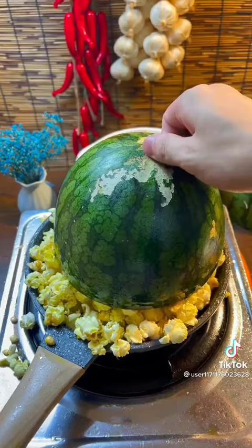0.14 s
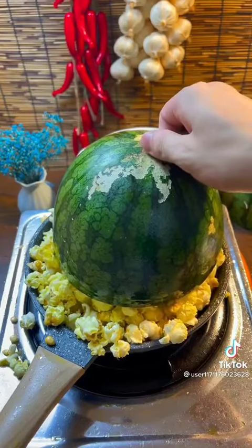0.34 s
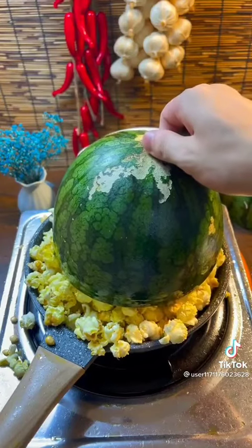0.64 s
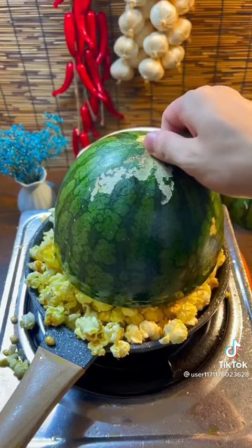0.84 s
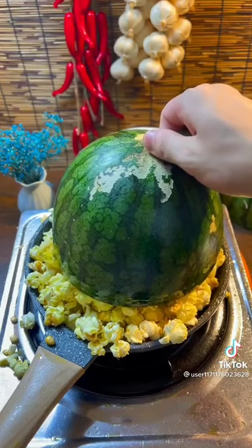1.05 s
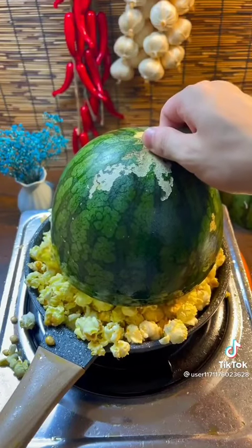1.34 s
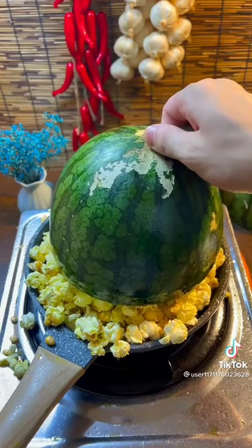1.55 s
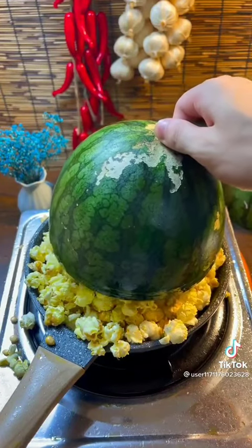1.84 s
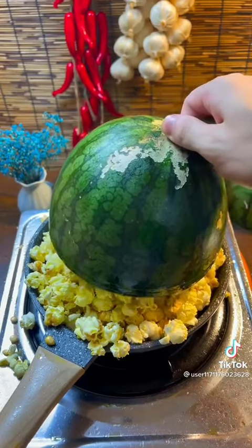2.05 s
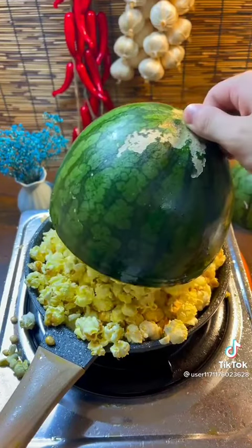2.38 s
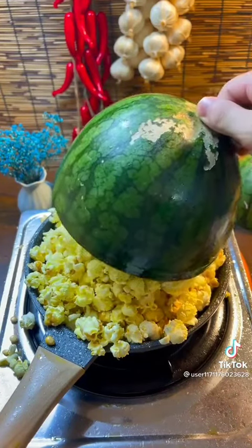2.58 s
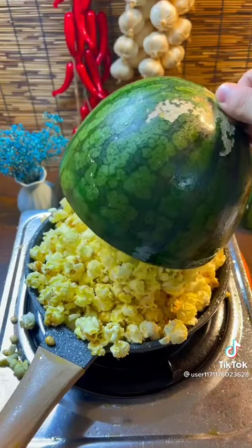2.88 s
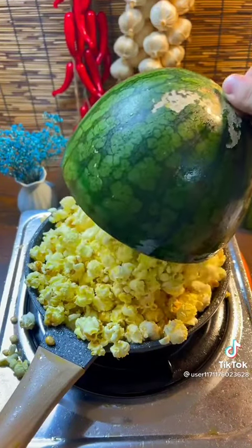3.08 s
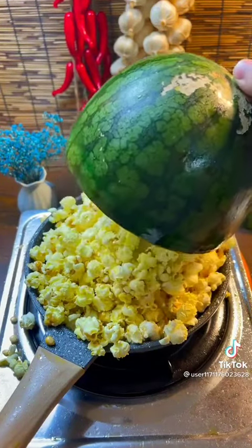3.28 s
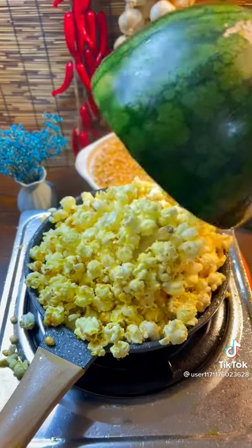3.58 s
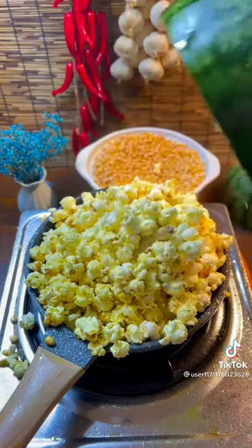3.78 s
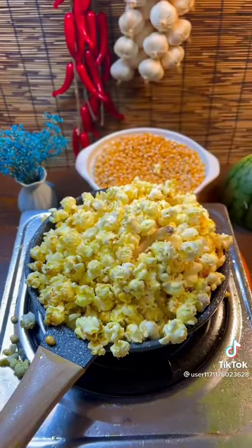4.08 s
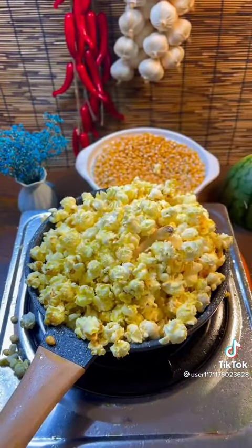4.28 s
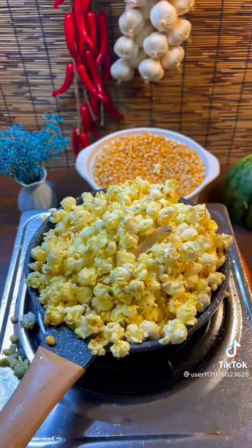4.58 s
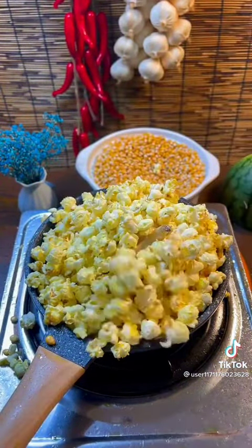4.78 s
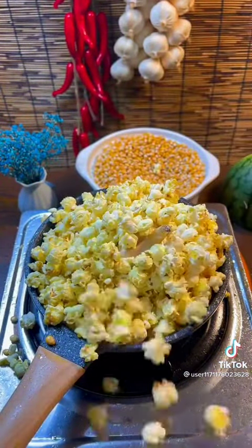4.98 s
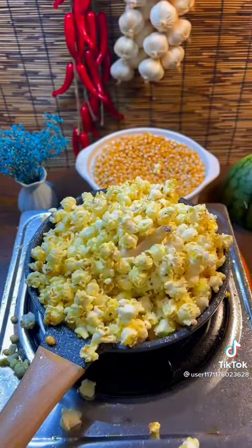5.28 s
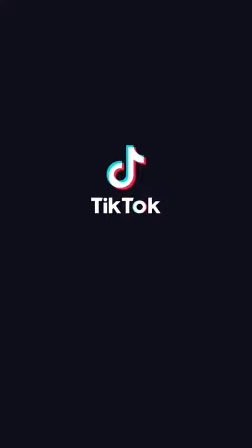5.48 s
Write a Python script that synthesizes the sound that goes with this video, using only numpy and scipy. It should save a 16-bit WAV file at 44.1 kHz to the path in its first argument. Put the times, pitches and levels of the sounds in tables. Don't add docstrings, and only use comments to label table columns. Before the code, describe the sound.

Close sizzling pan with small crackles and dull shell knocks, a quiet lull, then sharp popcorn bursts and flakes pattering onto sheet metal.

```python
import sys
import numpy as np
from scipy import signal
from scipy.io import wavfile
from scipy.ndimage import uniform_filter1d

SR = 44100
rng = np.random.default_rng(int(sys.argv[2]) if len(sys.argv) > 2 else 0)


def nominal_scale(level):
    x = np.asarray(level, float) / 20
    return 10 ** x


def generate_wav(signal):
    frames = np.transpose(np.atleast_2d(signal))
    scaled = np.clip(frames, -1, 1) * 32767
    pcm = np.round(scaled).astype(np.int16)
    wavfile.write(sys.argv[1], SR, pcm)


N = 248283
OPEN_S = 4.43


def evened(x):
    return x / np.sqrt(np.mean(x ** 2) + 1e-20)


def curve(points):
    return np.interp(np.arange(N) / SR, *np.transpose(points))


def read(points, hz):
    f, value = np.transpose(points)
    return np.interp(np.log(hz + 1), np.log(f + 1), value)


def coloured(x, points):
    level_db = read(points, abs(np.fft.fftfreq(4096, 1 / SR)))
    log_gain = np.log(nominal_scale(np.maximum(level_db, -70)))
    taps = np.fft.ifft(np.exp(np.conj(signal.hilbert(log_gain)))).real[:2048]
    return signal.oaconvolve(x, taps / np.linalg.norm(taps))[:len(x)]


def resonate(x, hz, width):
    turn = np.exp(2j * np.pi * np.cumsum(hz * np.ones(len(x))) / SR)
    r = np.exp(-np.pi * width / SR)
    return 2 * (turn * signal.lfilter([1 - r], [1, -r], x / turn)).real


def ring(x, modes, rise=1e-4):
    t = np.arange(SR // 2) / SR
    response = sum(nominal_scale(db - 60 * t / t60) * np.sin(2 * np.pi * hz * t) for hz, db, t60 in modes)
    return signal.oaconvolve(x, response * np.minimum(t / rise, 1))[:len(x)]


def add(mix, s, sound):
    part = mix[round(s * SR):][:len(sound)]
    part += sound[:len(part)]


def patchy(points, patch_db, flicker_db, size):
    frames = 4 * N // size + 5
    a, b, patches = rng.standard_normal((frames, size // 2 + 1, 3)).T
    patches = evened(uniform_filter1d(uniform_filter1d(patches, 4, 0), 8, 1))
    flicker = evened(uniform_filter1d(rng.standard_normal(frames), 3))
    usual_db = read(points, np.fft.rfftfreq(size, 1 / SR))[:, None]
    field = (a + 1j * b) * nominal_scale(usual_db + patch_db * patches + flicker_db * flicker)
    return evened(signal.istft(field, nperseg=size, noverlap=3 * size // 4)[1][:N])


# pitch_hz, density_db (per Hz)
EARLIER_SPECTRUM = [(500, -25), (1000, -18), (1400, 3), (1850, -10), (2600, 0), (3700, -9), (6500, -7),
                    (10500, -13), (12500, -9), (14400, -13)]


def earlier():
    t = np.arange(N) / SR
    fall_db_per_s = 150
    return nominal_scale(-42 - fall_db_per_s * t) * patchy(EARLIER_SPECTRUM, 1.2, .8, size=256)


# start_s, length_s, level_db
PAN_ROCKING = [(0, 0.19, -45), (0.297, 0.18, -53.5), (0.9, 0.67, -48.5), (1.702, 0.28, -64),
               (2.105, 0.084, -53.5), (2.37, 0.28, -55.5), (2.702, 0.46, -66), (3.2, 0.061, -55),
               (3.556, 0.27, -56), (4.441, 0.13, -38.5), (4.601, 0.084, -44), (4.721, 0.031, -37.5),
               (4.78, 0.12, -50), (4.925, 0.11, -40.5), (5.03, .55, -53.5)]
ROCK_REST_DB, ROCK_RISE_S, ROCK_FALL_S = -59, 0.017, 0.025


def rocking():
    t = np.arange(N) / SR
    power = nominal_scale(ROCK_REST_DB) ** 2
    for s, length, db in PAN_ROCKING:
        rise = 1 + (t - s) / ROCK_RISE_S
        fall = 1 - (t - s - length) / ROCK_FALL_S
        swell = np.clip(np.minimum(rise, fall), 0, 1)
        power = power + (nominal_scale(db) * swell) ** 2
    return np.sqrt(power)


# pitch_hz, width_hz, level_db
FAN_TONES = [(245.5, 5.8, -68), (298, 11, -74.5), (731, 76, -75)]


def stove():
    pitch_drift, level_drift = evened(signal.resample(rng.standard_normal((2, 160)), N, axis=1))
    phase = 2 * np.pi * np.cumsum(48 + 4.6 * pitch_drift) / SR
    rumble = np.sin(phase) * nominal_scale(3.6 * level_drift)
    tones = sum(nominal_scale(db) * evened(resonate(rng.standard_normal(N), hz, width)) for hz, width, db in FAN_TONES)
    return rocking() * evened(rumble) + tones


# start_s, end_s, start_pitch_hz, end_pitch_hz, level_db
RIM_SQUEAKS = [
    (0, 0.087, 1415, 1350, -61),
    (.33, 0.443, 1210, 1160, -64),
    (0.32, 0.554, 1390, 1450, -65),
    (1.538, 1.805, 1160, 1420, -64.5),
    (1.79, 1.89, 840, 830, -67.5),
    (3.273, 3.34, 1500, 1640, -65),
    (3.418, 3.465, 1350, 1340, -65),
    (3.42, 3.482, 500, 490, -58),
    (3.607, 3.673, 1080, 1050, -61.5),
]


def squeaks():
    out = np.zeros(N)
    draws = rng.standard_normal((len(RIM_SQUEAKS), SR // 2))
    for draw, (s, until, hz, end_hz, db) in zip(draws, RIM_SQUEAKS):
        n = round((until - s) * SR)
        glide = np.linspace(hz, end_hz, n)
        breath = evened(resonate(resonate(draw[:n], glide, 110), glide, 200))
        add(out, max(s, 0), nominal_scale(db) * breath * signal.windows.tukey(n, .4))
    return out


# pitch_hz, density_db (per Hz)
STIR_SPECTRUM = [(15, -37.5), (25, 0), (70, 0), (97, -8.5), (130, -0.5), (161, -5), (190, -6), (240, -5.5),
                 (410, -10), (700, -19.5), (910, -38), (1500, -99)]
# pitch_hz, density_db (per Hz)
RUB_SPECTRUM = [(350, -47), (600, -6.5), (866, -2), (996, -6.5), (1110, -5.5), (1210, -2.5), (1900, -12.5),
                (2470, -60), (4180, -120)]
# time_s, drag_db (above rest)
SHELL_DRAG = [(0, 17), (.08, 10), (.23, 5), (.46, 10.5), (.56, 5.5), (.8, 6), (1.29, 3), (1.51, 7),
              (1.94, 5.5), (2.06, 2), (3.13, -1), (3.3, 5), (3.42, 18), (3.6, 8.5), (3.8, 11), (3.93, 2.5),
              (4.42, -2)]
# time_s, slump_db (above rest)
HEAP_SLUMP = [
    (4.43, -6),
    (4.53, 14),
    (4.69, -2),
    (4.72, 18),
    (4.89, 3),
    (5.03, 18),
    (5.3, 16.5),
    (5.5, 2),
    (5.575, 8.5),
]


def heap():
    stir = patchy(STIR_SPECTRUM, 1.36, 2.15, size=1024)
    rub = patchy(RUB_SPECTRUM, 2.5, 0.44, size=1024)
    shut = np.arange(N) / SR < OPEN_S
    drag, slump = curve(SHELL_DRAG), curve(HEAP_SLUMP)
    rock_db = 20 * np.log10(rocking()) - ROCK_REST_DB
    stir_db = -61 + np.where(shut, 0.49 * drag + 0.29 * rock_db, 0.62 * slump)
    rub_db = -73 + np.where(shut, drag, 0.95 * slump)
    return nominal_scale(stir_db) * stir + nominal_scale(rub_db) * rub


def spits(per_s, spread_db):
    draw = rng.random((N, 3))
    present = draw[:, 0] < per_s / SR
    return present * np.sign(draw[:, 1] - .5) * nominal_scale(-spread_db * np.log(draw[:, 2] + 0.0073))


# pitch_hz, density_db (per Hz)
SHUT_FIZZ = [(1060, -27), (1800, -12), (2300, -2), (3150, -3.5), (3600, -11), (4570, -7), (5580, -13),
             (6410, -6.5), (8250, -11), (9730, -9.5), (10600, -14), (12000, -8), (14400, -14.5)]
# pitch_hz, density_db (per Hz)
TORN_FIZZ = [(900, -33), (1600, -8), (2600, 1), (3600, -7.5), (5200, -7.5), (6400, -7), (8000, -8.5),
             (9500, -5), (10600, -8), (12000, -4), (14400, -6)]
# time_s, level_db
FIZZ_LEVEL = [(0, -58), (.1, -56), (.18, -58.5), (.5, -66.5), (.9, -63.5), (1.6, -66), (2.9, -68.5),
              (3.34, -65.5), (3.42, -60), (3.8, -63.5), (3.93, -67), (4.42, -70), (4.44, -67), (4.97, -64),
              (5.03, -45), (5.27, -46), (5.31, -55.5), (5.55, -65)]


def oil():
    smear = nominal_scale(-60 * np.arange(600) / SR / 0.012)
    clicks = signal.oaconvolve(abs(spits(400, 3.3)), smear)[:N] * rng.standard_normal(N)
    shut = 0.9 * patchy(SHUT_FIZZ, 1.3, 1.4, size=256) + 0.85 * evened(coloured(clicks, SHUT_FIZZ))
    torn = 0.82 * patchy(TORN_FIZZ, 2.7, 2.0, size=256) + 0.77 * evened(coloured(clicks, TORN_FIZZ))
    return nominal_scale(curve(FIZZ_LEVEL)) * np.where(np.arange(N) / SR < OPEN_S, shut, torn)


def tear(draw, rise, length, spread_db):
    t = np.arange(len(draw)) / SR
    clicks = np.sign(draw[:, 0] - .5) * nominal_scale(-spread_db * np.log(draw[:, 1] + 0.015))
    return clicks * np.minimum(t / rise, 1) * nominal_scale(-20 * np.maximum(t - rise, 0) / length)


# pitch_hz, density_db (per Hz)
CRACK_SPECTRUM = [(150, -44), (400, -16), (900, -21.5), (1400, -7), (1800, -17.5), (2700, -8), (4100, -12),
                  (6370, -10), (8100, -13.5), (9570, -12), (10400, -18), (11800, -7.5), (12600, -12.5),
                  (14600, -15.5)]


def crackle(draw, db, treble_db, length=None, spray_db=-6.0):
    wall_hz = np.interp(draw[-1, 0], (0, 1), (2100, 3130))
    length = length or np.interp(draw[-1, 1], (0, 1), (0.0028, 0.0077))
    snap = 3.25 * tear(draw, .0001, 0.00051, 3.25)
    body = tear(draw, 0.00033, length, 6.53)
    spray = nominal_scale(spray_db) * tear(draw[::-1], 0.0037, 0.042, 3.0)
    x = coloured(snap + body + spray, CRACK_SPECTRUM)
    top = x - uniform_filter1d(x, size=5)
    wall_db = 5.5 - 0.4 * treble_db
    x = x + (nominal_scale(treble_db) - 1) * top + nominal_scale(wall_db) * resonate(x, wall_hz, 520)
    return nominal_scale(db) * x / abs(x).max()


# start_s, peak_db, treble_db, some with length_s, spray_db
SHELL_CRACKLES = [(.151, -26, 4.5), (0.1705, -25, 11, .002, -12), (.196, -41, -5), (0.237, -41, 0),
                  (.344, -41, 20), (0.3745, -42, 4), (0.4333, -40.5, 3.5), (0.4497, -32, 18, .002, -12),
                  (0.5763, -29.5, -10, .004, -11), (0.7629, -28.5, 7), (.836, -41, 8), (0.9016, -33.5, 4.5),
                  (0.92, -33, 0.5), (0.9799, -35, 1), (1.0098, -33, 4), (1.052, -41, -2), (1.13, -25.5, 9),
                  (1.211, -34, 2), (1.2464, -40, 4), (1.2714, -36.5, 2), (1.3162, -32.5, 16),
                  (1.4255, -38.5, -2), (1.47, -35, 7), (1.488, -34, -1.5)]
# start_s, peak_db, treble_db, some with length_s, spray_db
LIFTING_CRACKLES = [(1.6472, -43, 7), (1.92, -30.5, 22), (2.1003, -34.5, 2), (2.13, -33, -1),
                    (2.266, -43.5, 1), (2.36, -44.5, 1), (2.3796, -36.5, 8), (2.5505, -49, -21),
                    (2.6588, -49, -23), (2.851, -42, 5), (2.882, -48.5, -1), (3.203, -46.5, 3),
                    (3.3425, -28, -1, .006, -8), (3.3895, -27, 0, .004, -9), (3.4215, -41, -8),
                    (3.4675, -33, 6, .002, -13), (3.585, -39, 8), (3.613, -29, 4.5), (4.051, -48, -5),
                    (4.0768, -31.5, 4)]
# start_s, peak_db, treble_db
FURTHER_CRACKLES = [(.056, -42, -6), (2.771, -45.5, -3), (2.04, -48.5, -12), (.133, -36, 8), (0.581, -35.5, 16),
                    (0.5937, -36, 18), (0.635, -41, -2), (.785, -36, 2), (1.123, -40, -3), (1.137, -38, 1),
                    (1.262, -38.5, 0), (1.279, -35, 2), (1.321, -37, -4), (1.497, -30.5, 11),
                    (1.509, -38.5, -5), (1.929, -40, 7), (3.3565, -33, 8), (3.4825, -37, 4), (2.491, -51, -18)]
# start_s, peak_db, treble_db, length_s, some with spray_db
OPEN_CRACKLES = [
    (4.688, -45, 12, 0.0068),
    (4.89, -55, 7, .004),
    (4.95, -24, 7, 0.0087),
    (5.079, -26, 34, 0.002, -12),
    (5.157, -24, -3, 0.022),
    (5.206, -29.5, -1, .01),
    (5.259, -24, 14, 0.003, -10),
    (5.422, -38, 7.5, 0.014),
    (5.561, -44.5, 4, 0.017),
]
# start_s, peak_db, treble_db
FLAKE_TICKS = [(0.1108, -36, 19), (0.1194, -35, 15), (0.373, -47, 6.5), (0.624, -41, 6), (0.6639, -54, 4.5),
               (1.0613, -38, 6), (1.0954, -48, 9), (1.1643, -40, 8), (1.2926, -42, 6), (1.4205, -44, 6),
               (1.433, -40, 3), (1.5714, -58, 6), (1.6655, -46, 6), (1.7215, -50, 6), (1.7913, -54, -1),
               (1.9517, -43, 6), (2.3087, -50, 4), (2.7516, -47, 0), (2.9587, -54, 3), (3.0225, -58, 4),
               (3.1273, -43, 3), (3.2146, -43, 4), (3.257, -48, 11), (3.5184, -51, 10), (3.661, -44, 11),
               (3.717, -45, 6), (3.7554, -45, 9), (3.845, -45, 6), (3.8762, -44, 2), (4.143, -56, 4),
               (4.2702, -52, 6)]


def crackles():
    ticks = [(s, db - 0.5, treble_db, 0.0033) for s, db, treble_db in FLAKE_TICKS]
    rows = SHELL_CRACKLES + LIFTING_CRACKLES + FURTHER_CRACKLES + OPEN_CRACKLES + ticks
    out = np.zeros(N)
    for draw, (s, *how) in zip(rng.random((len(rows), 4000, 2)), rows):
        add(out, s - .0005, crackle(draw, *how))
    return out


# start_s, peak_db, treble_db
FAT_SPECKS = [(.0987, -40, 8), (.1235, -40, 12), (.158, -41, 16), (.1755, -36, 10), (.268, -46, 4),
              (.278, -47, -4), (.3007, -46, 6), (3.3665, -38, 18), (3.3775, -39, 10), (3.4085, -40, 18),
              (3.46, -42, 14), (3.4915, -44, 16), (.4625, -42, 12), (5.062, -30, 26), (5.0665, -29, 14),
              (5.096, -29, 24), (5.126, -33, 18), (5.225, -31, 26), (5.237, -29, 16), (5.245, -30, 20),
              (5.254, -31, 24), (5.266, -30, 26), (5.286, -32, 12), (5.31, -38, 20), (5.344, -40, 4)]


def specks():
    out = np.zeros(N)
    for draw, (s, db, treble_db) in zip(rng.random((len(FAT_SPECKS), 4000, 2)), FAT_SPECKS):
        add(out, s - .0005, crackle(draw, db, treble_db, length=.0015, spray_db=-18))
    return out


# start_s, peak_db, pitch_hz
SHELL_KNOCKS = [(0.153, -44.5, 479), (0.576, -43, 1390), (0.764, -42, 466), (0.839, -56, 452),
                (0.865, -49.5, 1490), (0.92, -44.5, 1410), (1.011, -54, 452), (1.051, -58, 724),
                (1.132, -49, 468), (1.318, -49, 673), (1.432, -57, 740), (1.507, -51, 1500),
                (1.795, -59, 840), (1.92, -46, 826), (2.101, -52, 1380), (2.128, -48, 570),
                (2.769, -57, 589), (3.342, -34.5, 590), (3.388, -42.5, 1240), (3.584, -47, 452),
                (3.612, -45, 1060), (4.077, -57, 1190)]


def knocks():
    out = np.zeros(N)
    width_hz = 580
    for draw, (s, db, hz) in zip(rng.random((len(SHELL_KNOCKS), 2000, 2)), SHELL_KNOCKS):
        blow = tear(draw, 0.00047, 0.0064, 5.8)
        x = resonate(resonate(blow, hz, width_hz), hz, 1.6 * width_hz)
        add(out, s - .0005, nominal_scale(db - 2.5) * x / abs(x).max())
    return out


# start_s, peak_db, colour (row of HULL_COLOURS), rise_s, length_s
HULL_TEARS = [(4.4296, -4, 0, 0.00076, 0.0044), (4.4338, -8, 3, 0.00047, 0.004),
              (4.7115, -21.5, 1, 0.0032, 0.011), (4.717, -18, 1, .0025, 0.0077),
              (4.7284, -27.5, 1, 0.00087, 0.002), (4.735, -31, 1, .002, 0.0093),
              (4.747, -35, 4, 0.0011, 0.0068), (4.444, -22, 3, .004, 0.0053), (4.772, -42, 4, 0.005, .02),
              (4.9222, -14, 2, 0.00032, .0015), (4.9132, -14, 2, 0.00097, 0.011),
              (4.918, -14, 2, 0.00093, 0.0062)]
# pitch_hz, density_db (per Hz)
HULL_COLOURS = [
    [(35, -40.5), (60, -5.5), (285, -4), (550, -13), (780, 0), (1100, 5), (1400, 7), (1700, -6.5),
     (2760, 4.5), (3900, -4.5), (4270, -6), (4680, -4), (9530, -12), (14400, -14.5)],
    [(35, -48), (60, -24), (500, 0), (750, 3), (984, 1), (1240, 5), (1870, -14.5), (2250, -9.5),
     (3560, -26), (4680, -13), (5500, -26), (12500, -26.5), (14400, -47)],
    [(35, -41.5), (60, -12), (240, -1), (400, -10.5), (878, 1.5), (1790, -9.5), (2960, 0), (3810, -10),
     (4170, -11.5), (8000, -13), (9900, -6), (14400, -12)],
    [(35, -41), (60, -12), (400, -10), (900, -2), (1400, 1), (1900, -8), (2700, 0), (4200, -9), (9500, -12),
     (14400, -20)],
    [(35, -45), (200, -14), (450, -2), (800, 2), (1300, -3), (2000, -16), (4000, -32), (14400, -50)],
]
# pitch_hz, level_db, t60_s
PAN_MODES = [(883, -60, .3), (1290, -52, .2), (1425, -51, .25), (2433, -55, .25), (335, -51.5, 0.13),
             (1130, -53.5, 0.24), (2630, -53, 0.17), (2670, -39, .025)]
# pitch_hz, level_db, t60_s
BOOM_MODES = [(48, -40.5, .5), (125, -42, .2), (194, -33.5, 0.33), (231, -37, 0.4)]
# pitch_hz, level_db, t60_s
SHELL_MODES = [(460, -48, .06), (623, -42, .04), (765, -35, .045), (1240, -36.5, .06), (4700, -51, .03)]


def bursts():
    out = np.zeros(N)
    for draw, (s, db, colour, rise, length) in zip(rng.random((len(HULL_TEARS), 4000, 2)), HULL_TEARS):
        x = coloured(tear(draw, rise, length, 4.45), HULL_COLOURS[round(colour)])
        add(out, s, nominal_scale(db) * x / abs(x).max())
    t = np.arange(N) / SR
    on_floor = out * (t < 4.61)
    buried = out * (t > 4.7) * (t < 4.8)
    return out + ring(on_floor, PAN_MODES) + ring(on_floor, BOOM_MODES, rise=.018) + ring(buried, SHELL_MODES)


# start_s, level_db, hold_s, fall_s (for 20 dB)
FLAKE_SCATTER = [
    (4.434, -25.5, 0.09, 0.14),
    (4.721, -34, 0.016, 0.12),
    (4.921, -32, 0.031, 4),
]
# pitch_hz, density_db (per Hz)
SCATTER_COLOURS = [
    [(35, -15.5), (60, -1.5), (128, -11.5), (212, 2.5), (292, -7), (555, -19), (858, -4.5), (1100, -5),
     (1400, -5), (1790, -13.5), (2500, -11), (3300, -14), (6000, -17.5), (8400, -25), (9600, -20),
     (11000, -30), (14400, -35)],
    [(35, -19), (60, -5), (400, -17), (750, -3), (1240, -7), (1590, -9), (2200, -11), (2460, -25),
     (4580, -24), (14400, -50)],
    [(35, -28), (80, -26), (140, -14), (215, 4), (320, -12), (518, -16.5), (1130, -10), (1490, -17),
     (2520, -13), (5370, -23), (14400, -28.5)],
]


def scatter():
    out, t = np.zeros(N), np.arange(SR // 2) / SR
    draws = rng.standard_normal((len(FLAKE_SCATTER), 2, len(t)))
    for draw, colour, (s, db, hold, fall) in zip(draws, SCATTER_COLOURS, FLAKE_SCATTER):
        grains = draw[0] * nominal_scale(2.5 * evened(uniform_filter1d(draw[1], size=90)))
        sag_db = 7.6 * t / hold + 20 * np.maximum(t - hold, 0) / fall
        x = evened(coloured(grains, colour))
        top = x - uniform_filter1d(x, size=5)
        x = x + (nominal_scale(3.5 - 40 * t) - 1) * top
        add(out, s, nominal_scale(db - sag_db) * np.minimum(t / 0.0035, 1) * x)
    return out


# start_s, peak_db, hardness_db, pitch_hz (favoured by the spot)
TRAY_LANDINGS = [(5.1715, -24, 8, 1480), (5.068, -28, -16, 436), (5.083, -19.5, 5, 800),
                 (5.092, -23.5, -6, 480), (5.102, -28, 0, 1150), (5.122, -22.5, -5, 290),
                 (5.134, -22, -1, 400), (5.128, -30, 2, 1230), (5.146, -26, -5, 302),
                 (5.1575, -18.5, 5, 480), (5.164, -22, 6, 1200), (5.18, -28, 0, 730), (5.19, -33, -3, 290),
                 (5.2, -26.5, 1.5, 1150), (5.21, -26, -2, 730), (5.22, -21, 2, 395), (5.238, -26, 4, 1230),
                 (5.247, -25, 5, 470), (5.262, -26, -3, 398), (5.287, -32, 0, 474), (5.315, -35.5, 0, 730),
                 (5.349, -40, -1, 730), (5.374, -44, -3, 394), (5.423, -45, 1, 390), (5.46, -51, -0.5, 730),
                 (5.5, -55, -3, 730), (5.569, -44, -0.5, 393)]
# pitch_hz, level_db, t60_s
TRAY_MODES = [(260, 0.5, 0.1), (285.6, -2, 0.2), (320, -4.5, 0.088), (392, 0.5, 0.12), (417, -4.5, 0.11),
              (461.4, -1, 0.21), (491, -2.5, 0.12), (560, -6.5, 0.077), (729, -1.5, 0.45), (740, -2, 0.14),
              (814, -5, 0.12), (970, -9, 0.11), (1160, -3.5, 0.1), (1242, -3, 0.18), (1480, -8, 0.11),
              (1830, -6, 0.074), (2270, -15, .05)]
# pitch_hz, density_db (per Hz)
THUD_SPECTRUM = [(88, -36), (150, -11.5), (401, 2), (554, -13), (721, -6), (872, -12), (1200, -8),
                 (1640, -17.5), (2100, -25), (2750, -17), (3400, -28), (5000, -39), (6500, -68),
                 (11000, -120)]


def tray():
    out, t = np.zeros(N), np.arange(SR // 4) / SR
    hz, mode_db, t60 = np.transpose(TRAY_MODES)[:, :, None]
    spots = rng.standard_normal((len(TRAY_LANDINGS), len(TRAY_MODES), 1))
    draws = rng.random((len(TRAY_LANDINGS), len(t), 2))
    for spot, draw, (s, db, hard_db, spot_hz) in zip(spots, draws, TRAY_LANDINGS):
        weight_db = mode_db + 2.9 * np.minimum(abs(spot), 2)
        hard_tilt_db = 0.3 * hard_db * np.log2(hz / 400)
        off_spot_db = 8.5 * abs(np.log2(hz / spot_hz))
        gain = np.sign(spot) * nominal_scale(weight_db + hard_tilt_db - off_spot_db - 60 * t / t60)
        flexed_hz = hz * (1 + 0.011 * spot)
        modes = (gain * np.sin(2 * np.pi * flexed_hz * t)).sum(0)
        modes = modes * (0.85 + nominal_scale(-60 * t / 0.13))
        thud = coloured(tear(draw, 0.00062, 0.018, 4.2), THUD_SPECTRUM)
        x = modes / abs(modes).max() + 0.75 * nominal_scale(hard_db) * thud / abs(thud).max()
        add(out, s, nominal_scale(db) * x / abs(x).max())
    return signal.lfilter(*signal.butter(2, 170, "high", fs=SR), out)


def kitchen(x):
    t = np.arange(SR // 2) / SR
    tail = uniform_filter1d(rng.standard_normal(len(t)), size=2)
    tail = tail * nominal_scale(-60 * t / 0.35) * np.minimum(t / 0.0042, 1)
    return signal.oaconvolve(x, tail / np.linalg.norm(tail))[:N]


def scene():
    hits = nominal_scale(1.0) * crackles() + knocks() + bursts() + tray()
    room = nominal_scale(-14.0) * kitchen(hits)
    beds = earlier() + stove() + squeaks() + heap() + oil() + specks() + scatter()
    return np.tile(hits + room + beds, (2, 1))


def roll_off(x):
    return signal.sosfilt(signal.butter(12, 15550, fs=SR, output="sos"), x)


def record(dry):
    mid = signal.oaconvolve(dry[0], signal.firwin(511, 14240, window=("kaiser", 9), fs=SR), "same")
    hz, t, z = signal.stft(mid, SR, nperseg=2048)
    band = (9 * np.log(1 + hz / 1000)).astype(int)
    chance = uniform_filter1d(rng.standard_normal((band.max() + 1, len(t))), size=2, axis=1)[band]
    often = np.interp(hz, [3700, 4200, 5700, 8300, 11000, 12500, 13800, 14200],
                      [-6, -1.6, .2, .7, .6, .6, .1, -3])
    power = (abs(z[hz > 4000]) ** 2).sum(0)
    steady = power < 30 * np.roll(power, 1)
    swapped = (chance < often[:, None]) * steady
    random_phase = np.exp(2j * np.pi * rng.random(z.shape))
    unlike = uniform_filter1d(abs(z), size=9, axis=0) * swapped * random_phase
    side = nominal_scale(-.5) * signal.istft(unlike, SR, nperseg=2048)[1][:N]
    stop = np.clip((5.578 - np.arange(N) / SR) / 0.0031, 0, 1)
    return roll_off(np.array([mid + side, mid - side]) * stop)


dry = scene()
out = record(dry)
generate_wav(out)
```